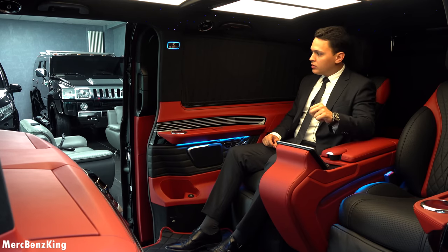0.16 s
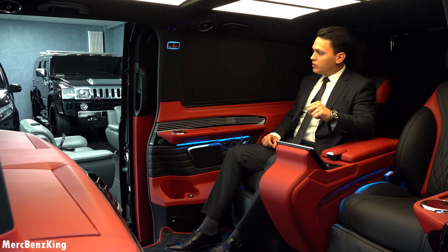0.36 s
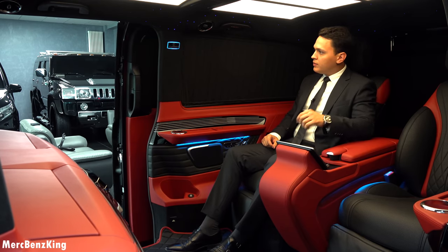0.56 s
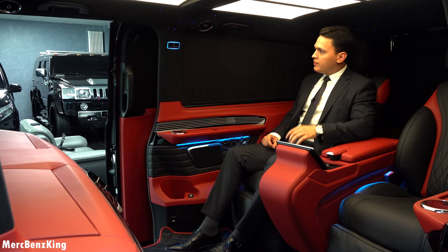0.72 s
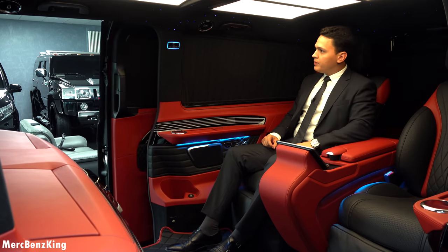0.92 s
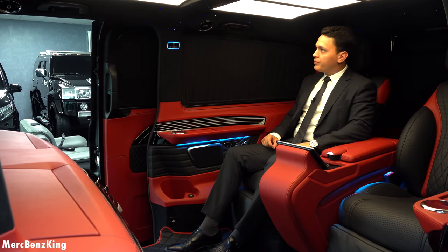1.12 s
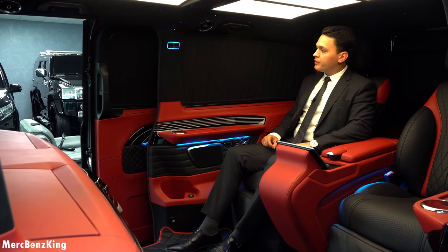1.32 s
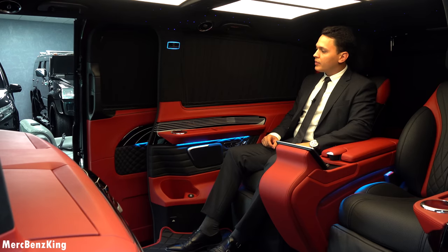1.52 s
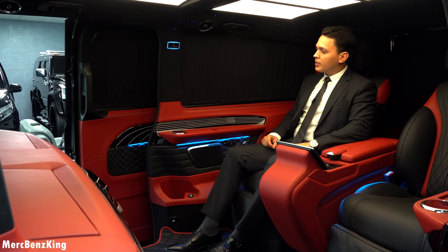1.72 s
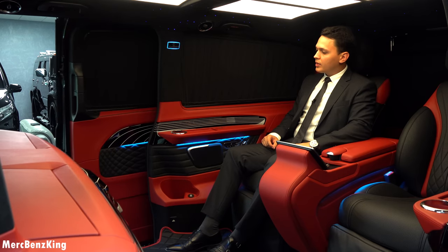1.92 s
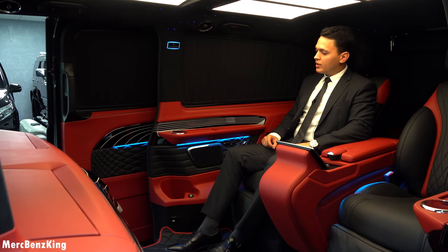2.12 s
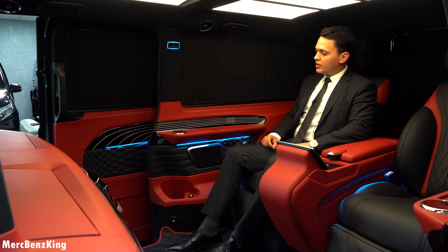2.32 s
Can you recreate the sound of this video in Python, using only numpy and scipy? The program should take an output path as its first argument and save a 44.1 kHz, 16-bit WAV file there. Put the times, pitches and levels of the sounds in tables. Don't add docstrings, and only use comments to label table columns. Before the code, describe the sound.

A motorised sliding van door heard from inside a padded cabin. Small clacks and thuds start at once, with the heaviest low lurch around 0.35-0.5 seconds. A deep, uneven roller rumble continues, with soft bumps near 0.6 and 1.0. A scrape at 1.2 leads to a quick bouncing latch clatter at 1.3, faintly echoed outside. Duller thuds near 1.7 and 2.05 follow, then a small lurch at 2.36, over faint whine and hiss.

```python
import sys
import numpy as np
from scipy import signal
from scipy.fft import rfft, irfft
from scipy.io import wavfile
from scipy.ndimage import uniform_filter1d

SR = 44100
rng = np.random.default_rng(int(sys.argv[2]) if len(sys.argv) > 2 else 0)


def undo_db(level):
    steps = np.asarray(level, float) / 20
    return 10 ** steps


def master(y):
    cut = np.clip(np.atleast_2d(y).T, -1, 1)
    pcm = np.round(cut * 32767)
    wavfile.write(sys.argv[1], SR, pcm.astype(np.int16))


N = 104208

# frequency in Hz, density in dB per Hz.
HISS_COLOUR = [
    (900, -40),
    (1600, -8),
    (2300, -5.5),
    (4500, -6),
    (6800, 0),
    (9200, 0),
    (9500, -8),
    (15700, -9.5),
]
# multiple of the motor pitch, level in dB.
WHINE_LINES = [
    (4, -90),
    (5, -89.5),
]
# time in seconds, rolling level in dB.
TRAVEL = [(0, -36), (.14, -33), (.27, -38.5), (.325, -50.5), (0.361, -27), (.55, -37.5), (.68, -35.5),
          (.73, -40), (0.821, -37.5), (.92, -37.5), (0.969, -36), (1.071, -40), (1.2, -34.5), (1.55, -36),
          (1.75, -34.5), (1.94, -38.5), (2.17, -37.5), (2.36, -38)]
# frequency in Hz, width in Hz, level in dB.
PANEL = [(36, 4.8, -4.5), (56, 4.2, -6), (90.7, 31, -2), (132.7, 42.3, -1), (192, 42.7, -8),
         (236.5, 61, -14), (337.2, 27.2, -9.5), (451.6, 85, -13), (596.5, 20, -19), (672, 143, -22),
         (761, 122, -25), (1060, 99, -52), (1195, 130, -38)]
# centre in seconds, peak in dB, half width in seconds.
THUDS = [(0.0125, -31.5, 0.0058), (0.098, -45, 0.0012), (0.1363, -22, 0.0024), (0.353, -24, 0.0011),
         (0.36, -26, 0.00168), (0.381, -23, 0.0086), (0.621, -26, 0.0082), (0.656, -27, 0.006),
         (0.809, -35, 0.0025), (.975, -27, 0.0064), (0.431, -16, 0.0057), (.449, -20.5, 0.002),
         (.466, -17, 0.0055), (.498, -26, 0.01), (0.526, -21, 0.0028), (1.274, -22.5, 0.0029),
         (1.282, -28, 0.0017), (1.312, -25, 0.0045), (1.702, -21.5, 0.0053), (1.733, -27.5, 0.0062),
         (1.752, -24, 0.0043), (2.009, -26, 0.0023), (2.022, -25, 0.0021), (2.058, -22.5, 0.0021),
         (2.072, -26, 0.0025), (2.086, -27.5, 0.002), (2.126, -26.5, 0.0043), (2.045, -25.5, 0.0022),
         (2.139, -29, 0.0035), (.076, -40, 0.0033), (0.115, -36, .002), (.259, -33, .003),
         (0.543, -36, 0.0017), (0.689, -30, 0.0018), (0.818, -26, 0.0024), (0.956, -39, 0.0044),
         (1.384, -28.5, 0.0033), (1.421, -25, 0.0018), (1.456, -24.5, 0.0021), (1.882, -30, 0.0028),
         (1.914, -27.5, 0.0022), (2.302, -32, 0.0021), (2.334, -36, 0.0019),
         (.3975, -17, .0025),
    (.412, -10.5, .0022),
    (2.3628, -24, .0015),
]
# frequency in Hz, level in dB, 60 dB decay in seconds.
BODY = [
    (32.5, -20, 0.17),
    (54, -1.5, 0.081),
    (96.5, -13, 0.48),
    (150, 2, 0.063),
    (185, -12, .1),
    (362, -24, 0.026),
]
# start in seconds, level in dB, decay in seconds, colour in Hz,
# colour width in Hz.
SEAL_DRAGS = [
    (.09, -57, 0.065, 6300, 2000),
    (.355, -57, 0.03, 5500, 3000),
    (.535, -63, 0.028, 2600, 600),
    (1.177, -54, 0.05, 5500, 5000),
    (1.255, -52, 0.03, 4000, 5000),
    (1.31, -56, 0.07, 5700, 4030),
    (1.5, -61, 0.17, 1160, 343),
]
# start in seconds, level in dB, chatter decay in seconds, colour in Hz,
# colour width in Hz.
CLACKS = [(0.03, -36, 0.0079, 1430, 210), (0.028, -43, 0.025, 2170, 1700), (0.049, -44, .014, 5670, 1100),
          (0.11, -52, .004, 2480, 3000), (0.13, -47.5, 0.026, 830, 1150), (0.2, -44, 0.017, 600, 500),
          (0.23, -48, 0.014, 1340, 190), (0.27, -52, 0.0013, 2400, 1900), (0.34, -42, 0.0092, 690, 740),
          (0.35, -39.5, 0.0067, 375, 260), (.39, -48.5, 0.0093, 810, 2020), (0.411, -36, 0.013, 690, 460),
          (0.407, -50, 0.022, 3270, 4200), (0.44, -43, 0.0061, 500, 398), (0.475, -48, 0.016, 920, 2800),
          (0.53, -52, 0.019, 870, 3020), (0.82, -54.5, 0.022, 1110, 380), (1.178, -39.5, 0.032, 1494, 280),
          (1.188, -44.5, 0.014, 390, 450), (1.264, -41.5, 0.019, 810, 830), (1.283, -35, 0.012, 2700, 5100),
          (1.302, -35, 0.0079, 570, 1700), (1.324, -54, 0.056, 3220, 390), (1.3, -57, 0.076, 1200, 820),
          (.224, -41.5, 0.011, 710, 650), (0.047, -47.5, 0.022, 714, 500), (0.36, -44, 0.0041, 540, 560),
          (.4, -46, 0.0075, 850, 700), (0.44, -42, 0.0052, 620, 450), (0.51, -45.5, 0.0064, 510, 470),
          (1.33, -49.5, 0.014, 2670, 1400), (1.179, -48, 0.02, 1950, 830), (1.64, -64, 0.021, 1200, 400),
          (1.79, -67, 0.011, 1200, 300), (1.36, -59, 0.038, 1680, 250), (.341, -52, 0.0087, 1340, 300),
          (1.29, -46.5, 0.014, 5300, 1800)]
# start in seconds, level in dB.
TICKS = [(.342, -52), (.463, -55), (.206, -50), (.522, -47), (.791, -52), (1.179, -45), (1.713, -60),
         (1.898, -63), (2.3175, -56)]
# frequency in Hz, level in dB, 60 dB decay in seconds.
LATCH_PLATE = [(328, 17.5, 0.039), (504, 12, 0.016), (774, 5, 0.015), (1030, 4, 0.031), (1192, 0.5, 0.02),
               (1407, 3, 0.011), (1775, -21, 0.09), (2480, 0, 0.024), (2780, -29, 0.014), (3500, -1, 0.045),
               (4930, -16, 0.029)]
# start in seconds, level in dB.
BOUNCES = [
    (1.2873, -28),
    (1.2902, -32),
    (1.2926, -23.5),
    (1.295, -23),
    (1.2974, -23.5),
    (1.3007, -29),
    (1.304, -38),
    (1.308, -29),
    (1.3145, -34),
]
# frequency in Hz, level in dB, 60 dB decay in seconds.
STRIKER = [(324.6, 0, 0.07), (486, -2, 0.024), (816, -0.5, 0.034), (945, -1.5, 0.023), (1140, -1, 0.022),
           (1413, 3, 0.02), (1620, -8, 0.016), (1744, -11, 0.034), (2400, -2.5, 0.014), (2910, -2.5, 0.024),
           (3150, -16, 0.022), (4880, -12, 0.0084), (6460, -19, 0.0094), (8060, -16.5, 0.0066)]

BUMPS_PER_S, BUMP_SPREAD_DB, SHIVER_DB = 2000, 2.0, 1.5
STEADY_ABOVE_HZ, STEADY_SHARE, MEAN_DB = 280, 0.63, -38
HISS_DB, MOTOR_HZ = -68, 595
HALL_DB, HALL_T60_S, HALL_TOP_HZ = -18, 0.6, 1700
BODY_DB, CRACK_DB = -7.5, -7.5
TRIM_TOP_HZ, BOLT_TOP_HZ = 7600, 9500
MODE_SCATTER = 0.025
MIC_LOW_HZ, MIC_TOP_HZ = 22.6, 15720


def unit(x):
    return x / np.sqrt(np.mean(x ** 2))


def band(x, hz, width_hz):
    return signal.lfilter(*signal.iirpeak(hz, hz / width_hz, fs=SR), x)


def double_band(x, hz, first_width_hz, second_width_hz):
    return band(band(x, hz, first_width_hz), hz, second_width_hz)


def modes(x, table):
    out = 0
    for k, (hz, db, t60) in enumerate(table):
        width_hz = np.log(1000) / (np.pi * t60)
        out = out + (-1) ** k * undo_db(db) * band(x, hz, width_hz)
    return out


def walk(rate_hz):
    k = int(SR / rate_hz)
    steps = np.repeat(rng.standard_normal(N // k + 1), k)
    return 1.12 * uniform_filter1d(uniform_filter1d(steps, k), k)[:N]


def hiss():
    hz = np.arange(N // 2 + 1) * SR / N + 1
    shape_hz, shape_db = np.array(HISS_COLOUR).T
    db = np.interp(np.log(hz), np.log(shape_hz), shape_db)
    spectrum = rfft(rng.standard_normal(N)) * undo_db(db)
    return undo_db(HISS_DB) * unit(irfft(spectrum, N))


def hall(x):
    age = np.arange(SR) / SR
    build_up = np.minimum(age / 0.0072, 1)
    tail = rng.standard_normal(SR) * undo_db(-60 * age / HALL_T60_S) * build_up
    tail = signal.lfilter(*signal.butter(3, HALL_TOP_HZ, fs=SR), tail)
    tail = tail / np.sqrt(np.sum(tail ** 2))
    return undo_db(HALL_DB) * signal.fftconvolve(x, tail)[:N]


def motor():
    phase = 2 * np.pi * np.cumsum(MOTOR_HZ * (1 + 0.00447 * walk(3.0))) / SR
    out = 0
    for multiple, db in WHINE_LINES:
        level = undo_db(db + 5.2 * walk(8.7))
        out = out + level * np.sqrt(2) * np.sin(round(multiple) * phase)
    return out


def rollers(t):
    travel_s, travel_db = np.array(TRAVEL).T
    load_db = np.interp(t, travel_s, travel_db) - MEAN_DB
    out = 0
    for hz, width, db in PANEL:
        luck = rng.random((3, N))
        struck = luck[0] < BUMPS_PER_S / SR
        side = np.sign(luck[1] - 0.5)
        bumps = struck * side * undo_db(-BUMP_SPREAD_DB * np.log(luck[2] + 1 / 50))
        share = STEADY_SHARE if hz > STEADY_ABOVE_HZ else 1
        level = undo_db(db + share * load_db + SHIVER_DB * walk(12.94))
        out = out + level * unit(double_band(bumps, hz, width * 1.95, width * 1.95))
    return out * undo_db(MEAN_DB - 4.5)


def thuds(t):
    push = 0
    for centre, db, half in THUDS:
        spread = ((t - centre) / half) ** 2
        push = push + undo_db(db) * (1 - spread) * np.exp(-0.5 * spread)
    return push + undo_db(BODY_DB) * modes(push, BODY)


def clacks(t):
    ticks = [(start, db, 0.001, 2200, 3000) for start, db in TICKS]
    contact = 0
    for start, db, decay, hz, width in CLACKS + SEAL_DRAGS + ticks:
        age = np.maximum(t - start, 0) / decay
        colour = unit(double_band(rng.standard_normal(N), hz, width, width * 1.18))
        swell = age ** 0.42 * np.exp(-age) * 2
        contact = contact + undo_db(db) * colour * swell
    ring = undo_db(CRACK_DB) * contact + undo_db(-2) * modes(contact, LATCH_PLATE)
    return signal.lfilter(*signal.butter(3, TRIM_TOP_HZ, fs=SR), ring)


def bolt(t):
    out = 0
    for start, db in BOUNCES:
        age = np.clip(t - start, 0, 0.5)
        lucks = rng.standard_normal((len(STRIKER), 3))
        for (hz, mode_db, t60), luck in zip(STRIKER, lucks):
            pitch = hz * (1 + MODE_SCATTER * luck[2])
            level = undo_db(db + mode_db - 6.0 + 0.86 * luck[0] - 60 * age / t60)
            out = out + level * np.sign(luck[1]) * np.sin(2 * np.pi * pitch * age)
    return signal.lfilter(*signal.butter(2, BOLT_TOP_HZ, fs=SR), out)


def scene():
    t = np.arange(N) / SR
    hits = clacks(t) + bolt(t)
    background = hiss() + hall(hits) + motor()
    door = rollers(t) + thuds(t) + hits
    return (background + door)[None]


def roll_off(x):
    return signal.sosfilt(signal.butter(12, 16210, fs=SR, output="sos"), x)


def record(dry):
    low_cut = signal.butter(2, MIC_LOW_HZ, "high", fs=SR)
    x = signal.filtfilt(*low_cut, dry, padtype="even")
    top_cut = signal.ellip(10, 0.2, 60, MIC_TOP_HZ, fs=SR, output="sos")
    mix = signal.sosfilt(top_cut, x)
    return roll_off(mix)


dry = scene()
out = record(dry)
master(out)
```